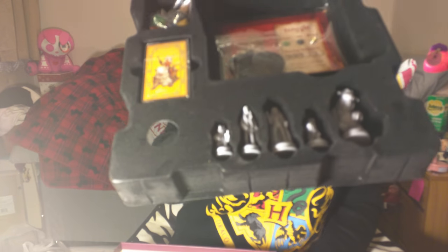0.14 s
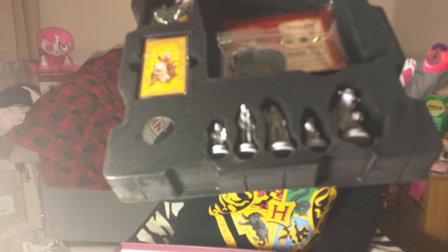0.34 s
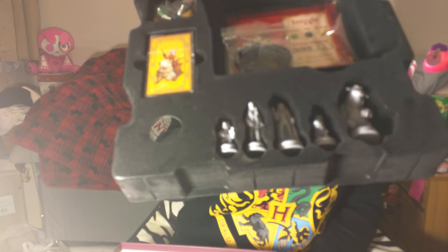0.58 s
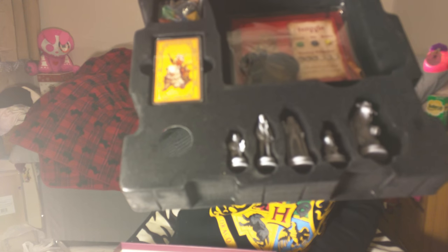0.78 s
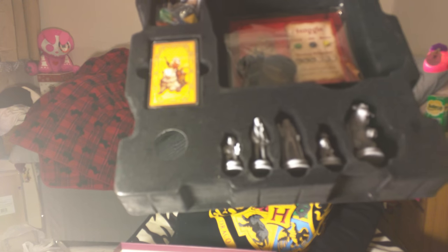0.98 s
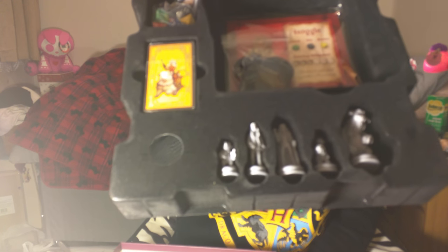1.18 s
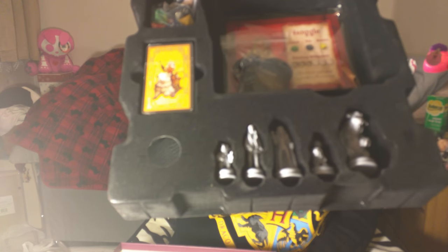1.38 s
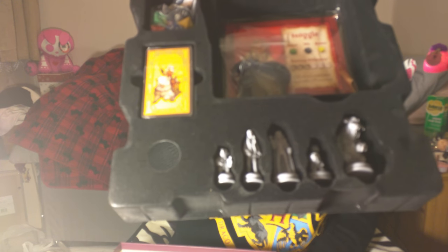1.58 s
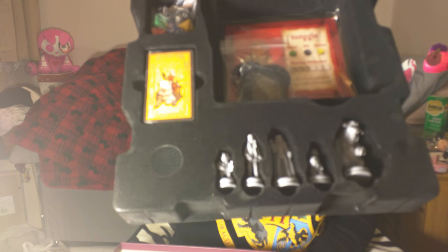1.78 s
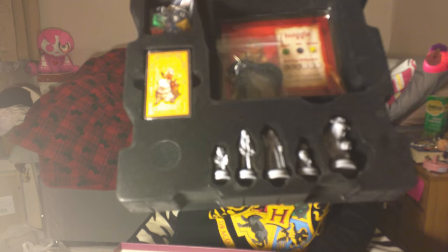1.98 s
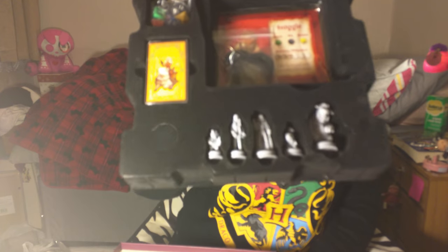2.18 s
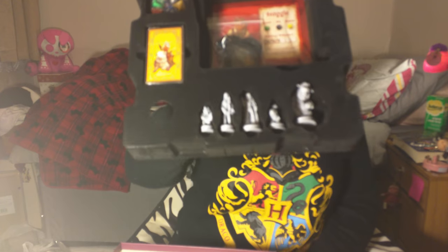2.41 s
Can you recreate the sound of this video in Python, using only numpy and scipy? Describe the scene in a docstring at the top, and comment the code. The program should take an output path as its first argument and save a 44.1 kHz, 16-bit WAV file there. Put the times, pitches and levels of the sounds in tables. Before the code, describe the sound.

Moulded plastic tray lifted from a cardboard box: loud hollow knock, faint rubbing, hissing scrape, clicks and bumps.

```python
"""A moulded game tray, lifted out of its cardboard box close by in a small furnished room, knocks and clicks.
Each knock rings a thump, hollow body modes and stiff walls; loose pieces ring and their bag crinkles in noise.
Granular friction noise makes the scrapes on cardboard, the finger rubs and the dull bumps; the hand rumbles.
Behind it are steady room noise, a sine mains hum and a thin whine of narrow noise that comes and goes."""
import sys
import numpy as np
from scipy import signal
from scipy.fft import rfft, irfft
from scipy.io import wavfile
from scipy.ndimage import uniform_filter1d

SR = 44100
rng = np.random.default_rng(int(sys.argv[2]) if len(sys.argv) > 2 else 0)


def dump(signal):
    """Clip the signal to [-1, 1] and save it as 16-bit WAV at the path in sys.argv[1]."""
    limited = np.clip(np.atleast_2d(signal).T, -1, 1)
    pcm = np.round(limited * 32767).astype(np.int16)
    wavfile.write(sys.argv[1], SR, pcm)


N = 108045  # samples

# Modes of the tray's hollow body before each blow weights them: pitch_hz, level_db, t60_s
BODY_MODES = [(209, -6, .08), (268, -5, .06), (308, 0, .09), (358, -2, .10), (442, -7, .06), (558, -2, .14),
              (690, -8, .07)]


def knocks():
    """Each knock thumps the tray and rings its hollow body and walls, with a snap at the contact."""
    # Knocks on the tray: start_s, thump_db, body_db, body_centre_hz, wall_db, wall_centre_hz, snap_db
    knock_rows = [(0.125, -67, -66, 400, -62, 1280, -77), (0.2204, -32.5, -24.5, 288, -26, 1140, -38.5),
                  (0.2228, -42.5, -25, 290, -32.5, 1190, -41), (.238, -66, -28, 430, -45, 1090, -39.5),
                  (.246, -46, -40, 400, -40.5, 1785, -38.5), (.358, -62, -58, 450, -38, 2050, -42),
                  (0.3613, -79, -41, 424, -30.5, 1738, -38), (0.3674, -70, -34, 369.4, -32.5, 1600, -65),
                  (0.903, -72, -45.5, 555, -40.5, 1180, -49), (.920, -61, -47, 497, -53, 1170, -51),
                  (1.168, -75, -50.5, 450, -50.5, 1620, -74), (1.372, -63, -58.5, 397, -54.5, 1860, -71),
                  (1.9629, -36.5, -45, 500, -38, 846, -40), (1.980, -59, -42, 500, -53, 726, -49.5),
                  (2.144, -57, -42, 440, -48.5, 930, -40), (2.153, -57, -44.5, 448, -46, 1400, -40.5),
                  (2.161, -54, -44.5, 450, -50.5, 1100, -49), (2.327, -59, -62, 305, -52.5, 1560, -68)]
    # Low modes of the whole tray: pitch_hz, level_db, t60_s
    thump_modes = [(116.3, -9, 0.035), (153, 2.5, 0.026), (217, 1, 0.15), (236, -9.5, 0.12)]
    # Spectrum of the contact snap: frequency_hz, level_db
    snap_colour = [(500, 6), (1500, -0.5), (2500, -3), (3700, -5.5), (4700, -11.5), (6000, -6),
                   (8000, -16.5), (11000, -19), (16000, -25)]
    out = np.zeros(N)
    for start_s, thump_db, body_db, body_hz, wall_db, wall_hz, snap_db in knock_rows:
        add_blow(out, start_s, ring(thump_modes), thump_db)
        add_blow(out, start_s, hollow_body(body_hz), body_db)
        add_blow(out, start_s, stiff_walls(wall_hz), wall_db)
        add_blow(out, start_s, crack(snap_colour, t60_s=0.054), snap_db)
    return out


def hollow_body(centre_hz):
    """Hollow body modes, strongest around the centre frequency of the blow."""
    spread_oct = 0.67
    modes = [(hz, db + place_db(hz, centre_hz, spread_oct), t60_s) for hz, db, t60_s in BODY_MODES]
    return ring(modes)


def stiff_walls(centre_hz):
    """Wall modes in a rattle: a decaying noise that stands for many dense, damped modes."""
    # Modes of the stiff walls before the blow weights them: pitch_hz, level_db, t60_s
    wall_modes = [(653, 8, 0.073), (796, 0.5, 0.031), (1037, -6.5, 0.058), (1190, -8.5, 0.021),
                  (1323, 7.5, 0.016), (1370, 2.5, 0.039), (1646, 2.5, 0.017), (1870, 3.5, 0.047),
                  (2120, -6, 0.035), (2166, -1.5, 0.11), (3470, 4.5, 0.19), (3720, 18.5, 0.059)]
    mode_spread_oct, rattle_spread_oct = 0.46, 0.44
    rattle_db = -2  # relative to the modes
    modes = ring([(hz, db + place_db(hz, centre_hz, mode_spread_oct), t60_s) for hz, db, t60_s in wall_modes])
    rattle_hz = np.geomspace(200, 6000, num=16)
    rattle_colour = [(hz, place_db(hz, centre_hz, rattle_spread_oct)) for hz in rattle_hz]
    rattle = crack(rattle_colour + [(16000, -50)], t60_s=0.065)
    return unit(modes) + undb(rattle_db) * unit(rattle)


def place_db(hz, centre_hz, spread_oct):
    """The place of a blow favours the modes around one frequency."""
    octaves_away = np.log2(hz / centre_hz)
    return max(-4 * (octaves_away / spread_oct) ** 2, -35)


def clicks():
    """Small pieces tick in their wells and their bag crinkles."""
    # Clicks of the pieces and their bag: start_s, ring_db, crinkle_db
    click_rows = [(0.3005, -62, -44), (.305, -55, -58), (0.318, -59, -51), (0.959, -54, -57),
                  (2.056, -49, -54.5), (2.1411, -34.5, -41), (2.147, -40.5, -53), (2.156, -47, -42.5),
                  (2.164, -57, -50), (2.304, -51, -56)]
    # Modes of a small piece: pitch_hz, level_db, t60_s
    piece_modes = [(2296, -5.5, 0.12), (2580, -0.5, 0.13), (2940, 9.5, 0.01), (3190, -0.5, 0.039),
                   (3714, -7, 0.075), (5010, -3, .03)]
    # Spectrum of the bag: frequency_hz, level_db
    crinkle_colour = [(800, -13), (2000, -5), (4000, 1.5), (6500, -2.5), (10000, 0), (13000, -4.5),
                      (16000, -12)]
    out = np.zeros(N)
    for start_s, ring_db, crinkle_db in click_rows:
        add_blow(out, start_s, ring(piece_modes), ring_db)
        add_blow(out, start_s, crack(crinkle_colour, t60_s=0.1), crinkle_db)
    return out


def long_scrape():
    """The tray comes free: friction on cardboard sings in narrow resonances while the body shudders."""
    # Course of the scrape: time_s, hiss_db, shudder_db
    scrape_course = [(1.6, -54, -72), (1.638, -51, -58.5), (1.676, -37.5, -41), (1.726, -36, -44),
                     (1.858, -51, -55.5), (1.922, -64, -58), (1.95, -59, -61)]
    # Spectrum of the hiss: frequency_hz, level_db
    scrape_colour = [(410, -18), (700, -15.5), (1010, -24), (1380, -6), (1920, -12.5), (2370, 0.5),
                     (3030, -14.5), (3790, -3.5), (6920, -8), (7490, -12.5), (9110, -11), (16000, -23)]
    # Resonances added to the hiss: pitch_hz, width_hz, level_db
    scrape_rings = [(1380, 60, -7), (2490, 170, -10), (3540, 89, 3.5), (5000, 160, -14), (6160, 94, -2),
                    (6800, 110, 1), (8970, 140, 2)]
    # Spectrum of the shuddering body: frequency_hz, level_db
    shudder_colour = [(60, -4.5), (95, 0.5), (190, -9), (330, -5.5), (560, -11), (800, -17), (1500, -23.5)]
    hiss = resonate(friction(scrape_colour, rough_db=-0.4), scrape_rings)
    shudder = friction(shudder_colour, rough_db=1.5)
    return hiss * curve(scrape_course) + shudder * curve(scrape_course, column=2)


def short_slide():
    """A short slide against the box: sparser slips, coloured by narrow resonances."""
    # Course of the slide: time_s, level_db
    slide_course = [(.664, -71), (.671, -46), (.70, -43.5), (.745, -48.5), (.785, -52.5), (.812, -62),
                    (.87, -68.5)]
    # Spectrum of the slide: frequency_hz, level_db
    slide_colour = [(150, -41), (250, -12), (313, -25), (367, 0), (452, -6), (686, -8), (938, -11),
                    (1080, -5.5), (2710, -2.5), (3400, -4), (3980, -3.5), (5350, -10), (7190, -8.5),
                    (16000, -17.5)]
    # Resonances added to the slide: pitch_hz, width_hz, level_db
    slide_rings = [(1220, 52, -1), (1630, 52, -4), (2030, 78, -11), (3160, 78, -17), (4130, 140, 1)]
    slide = friction(slide_colour, rough_db=1, grains_per_s=800)
    return resonate(slide, slide_rings) * curve(slide_course)


def finger_rubs():
    """Fingers rub the tray: a mid-range rasp and a high hiss of friction swell together."""
    # Finger rubs: start_s, rise_s, hold_s, release_s (per 20 dB of fall), rasp_db, hiss_db
    rub_rows = [(0.859, 0.038, 0.063, 0.15, -59.5, -64.5), (1.079, 0.016, 0.025, 0.034, -57, -68),
                (1.127, 0.041, 0.044, 0.12, -53.5, -56.5), (1.274, 0.018, 0.0085, 0.05, -57.5, -91),
                (1.358, 0.013, 0.096, 0.078, -57.5, -57), (1.475, 0.015, 0.014, 0.1, -54.5, -54),
                (1.556, 0.0059, 0.046, 0.086, -48.5, -53.5), (1.969, 0.022, 0.014, 0.032, -52, -59.5),
                (2.054, 0.045, 0.069, 0.054, -51, -52.5), (2.222, 0.06, 0.047, 0.16, -59.5, -78),
                (2.404, 0.017, 0.037, 0.056, -65, -67)]
    # Spectrum of the rasp: frequency_hz, level_db
    rasp_colour = [(250, -3.5), (450, 1), (800, -3), (1500, 6.5), (2000, -0.5), (2550, 3), (3100, -4.5),
                   (3600, -3), (5000, -13)]
    # Spectrum of the hiss: frequency_hz, level_db
    rub_hiss_colour = [(1500, -27), (3000, -11), (4500, -5), (6500, -2.5), (10000, -2), (16000, -5.5)]
    rasp = friction(rasp_colour, rough_db=1.0) * strokes(rub_rows, level_column=4)
    hiss = friction(rub_hiss_colour, rough_db=-3.5) * strokes(rub_rows, level_column=5)
    return rasp + hiss


def flexing_bumps():
    """The tray flexes with dull bumps of low friction noise that sound its hollow body modes."""
    # Bumps: start_s, rise_s, hold_s, release_s (per 20 dB of fall), level_db
    bump_rows = [(0.795, 0.019, 0.023, 0.051, -64), (1.07, 0.013, .05, 0.084, -58.5),
                 (1.177, 0.03, 0.0075, 0.075, -43), (1.385, 0.012, 0.16, 0.083, -65.5),
                 (1.554, 0.019, 0.04, 0.14, -57), (2.018, 0.045, 0.043, 0.025, -53.5),
                 (2.112, 0.015, 0.022, 0.044, -46.5), (2.191, 0.007, 0.01, 0.026, -47.5),
                 (2.232, 0.016, 0.0094, 0.019, -49), (2.285, 0.0068, .02, 0.024, -51.5),
                 (2.332, 0.0068, 0.011, 0.042, -53), (2.377, 0.0054, 0.0053, 0.02, -51),
                 (2.408, 0.0053, .015, 0.024, -60)]
    # Spectrum of the bumps: frequency_hz, level_db
    bump_colour = [(90, -0.5), (180, -8.5), (260, 2), (370, 2), (500, -5), (700, -12), (1200, -33)]
    ring_db = -1  # the same for every mode
    # A mode's bandwidth follows from its decay time
    body_rings = [(hz, np.log(1000) / np.pi / t60_s, ring_db) for hz, _, t60_s in BODY_MODES]
    bumps = resonate(friction(bump_colour, rough_db=1.5), body_rings)
    return bumps * strokes(bump_rows, level_column=4)


def hand_rumble():
    """The moving hand rumbles: low noise whose level swells and sinks."""
    # Course of the rumble: time_s, level_db
    rumble_course = [(0, -55), (1.1, -57), (1.9, -60), (1.98, -45), (2.05, -47.5), (2.17, -38.5),
                     (2.26, -48), (2.32, -40), (2.38, -47), (2.45, -46)]
    # Spectrum of the rumble: frequency_hz, level_db
    rumble_colour = [(15, 15.5), (30, -6), (45, 4), (65, -16), (110, 4), (220, -41.5)]
    return unit(colour(rng.standard_normal(N), rumble_colour)) * curve(rumble_course)


def ring(modes, detune=0.0074, scatter_db=-0.07):
    """Decaying sine modes; each blow detunes and weights them a little differently."""
    t, out = clock()[:N // 4], np.zeros(N)
    for k, (hz, db, t60_s) in enumerate(modes):
        pitch_draw, level_draw = rng.standard_normal(2)
        sign = (-1) ** (k // 2)  # alternates in pairs
        tone = np.sin(2 * np.pi * hz * (1 + detune * pitch_draw) * t)
        out[:len(t)] += sign * undb(db + scatter_db * level_draw) * tone * decay(t, t60_s)
    return out


def crack(points, t60_s):
    """A quickly dying burst of coloured noise."""
    return colour(rng.standard_normal(N) * decay(clock(), t60_s), points)


def add_blow(out, start_s, sound, db):
    """Mix in a blow whose first 3.6 ms have the given rms level."""
    start = max(int(start_s * SR), 0)
    onset = sound[:int(0.0036 * SR)]
    out[start:] += sound[:N - start] * undb(db) / np.sqrt(np.mean(onset ** 2))


def friction(points, rough_db=1.5, catch_hz=120, grains_per_s=2500):
    """Dense tiny slips over smooth hiss, catching unevenly."""
    grain_scatter_db, smooth_share = -1.5, 0.39  # share of the power
    is_slip = rng.random(N) < grains_per_s / SR
    slips = is_slip * rng.choice([-1, 1], N) * undb(grain_scatter_db * rng.standard_normal(N))
    hiss = rng.standard_normal(N)
    drive = np.sqrt(1 - smooth_share) * unit(slips) + np.sqrt(smooth_share) * hiss
    # Averaged noise makes the level waver
    catch = unit(uniform_filter1d(rng.standard_normal(N), int(SR / catch_hz)))
    return unit(colour(drive * undb(rough_db * catch), points))


def resonate(x, rings):
    """Add narrow (pitch_hz, width_hz, level_db) resonances to a friction noise."""
    out = x
    for hz, width_hz, db in rings:
        b, a = signal.iirpeak(hz, hz / width_hz, fs=SR)
        out = out + undb(db) * signal.lfilter(b, a, x)
    return unit(out)


def stroke(start_s, rise_s, hold_s, release_s):
    """Linear rise, hold, then a fall of 20 dB per release time."""
    t = clock() - start_s
    fall_db = -20 * np.maximum(t - rise_s - hold_s, 0) / release_s
    return np.clip(t / rise_s, 0, 1) * undb(fall_db)


def strokes(rows, level_column):
    """Sum of the strokes in a table, each at the level in the given column."""
    return sum(stroke(*row[:4]) * undb(row[level_column]) for row in rows)


def curve(rows, column=1):
    """Gain interpolated in dB between timed rows, all but silent outside them."""
    rows = np.array(rows)
    return undb(np.interp(clock(), rows[:, 0], rows[:, column], left=-120, right=-120))


def undb(db):
    """Decibels to amplitude."""
    return 10 ** (np.asarray(db) / 20)


def unit(x):
    """Scale to rms 1."""
    return x / np.sqrt(np.mean(x ** 2) + 1e-18)


def clock():
    """Time of every sample in seconds."""
    return np.arange(N) / SR


def decay(t, t60_s):
    """Exponential fall of 60 dB in t60_s."""
    return np.exp(-np.log(1000) * t / t60_s)


def bin_hz():
    """Frequency of every bin, raised by 1 Hz to keep clear of zero."""
    return np.arange(N // 2 + 1) * SR / N + 1


def on_log_axis(points):
    """Value of (frequency_hz, value) points at every frequency bin."""
    hz, value = np.array(points).T
    return np.interp(np.log(bin_hz()), np.log(np.maximum(hz, 1)), value)


def colour(x, points):
    """Filter with a (frequency_hz, level_db) response that falls away below its first point."""
    low_cut = 1 / np.sqrt(1 + (.5 * points[0][0] / bin_hz()) ** 4)
    return causal(x, undb(on_log_axis(points)) * low_cut + 1e-5)


def causal(x, gain):
    """Minimum-phase filter with the given gain at every frequency bin."""
    cepstrum = irfft(np.log(gain), N)
    # Fold the cepstrum forward in time
    cepstrum[1:N // 2] *= 2
    cepstrum[N // 2:] = 0
    return irfft(rfft(x) * np.exp(rfft(cepstrum)), N)


def room(x, wet_db):
    """Direct sound, a few wall echoes and a diffuse tail that decays at its own rate in each band."""
    # Decay of the room: band_hz, t60_s
    room_decay = [(150, 0.41), (400, 0.17), (1000, 0.28), (2500, 0.25), (6000, 0.3), (14000, 0.083)]
    # Nearby walls: delay_s, level_db
    wall_echoes = [(.0165, -16), (.0205, -17), (.0235, -25.5)]
    build_s = 0.007
    t, tail = clock(), np.zeros(N)
    for k, (_, t60_s) in enumerate(room_decay):
        # Each band crossfades into its neighbours
        band_power = on_log_axis([(hz, float(j == k)) for j, (hz, _) in enumerate(room_decay)])
        band_noise = irfft(rfft(rng.standard_normal(N)) * np.sqrt(band_power), N)
        tail += band_noise * decay(t, t60_s)
    tail *= (1 - np.exp(-t / build_s)) ** 2
    response = undb(wet_db) * unit(tail) / np.sqrt(N)
    response[0] = 1  # direct sound
    for delay_s, db in wall_echoes:
        response[int(delay_s * SR)] += undb(db)
    return signal.fftconvolve(x, even_out(response))[:N]


def even_out(response):
    """Level the narrow peaks and dips of a room response, so that no single note booms."""
    power = np.abs(rfft(response)) ** 2
    broad = uniform_filter1d(power, size=2000)
    narrow = uniform_filter1d(power, size=70)
    return causal(response, np.sqrt(broad / narrow))


def thin_whine():
    """Spells of a thin whine: noise in a very narrow high band."""
    # Spells of the whine: start_s, end_s (before its release), pitch_hz, level_db
    whine_rows = [(0, 0.22, 10770, -69), (0.87, 0.945, 10900, -64), (1.549, 1.596, 10800, -59),
                  (1.888, 1.963, 11050, -71)]
    width_hz = 65
    out = np.zeros(N)
    for start_s, end_s, hz, db in whine_rows:
        edges_hz = [hz - width_hz / 2, hz + width_hz / 2]
        band = signal.butter(2, edges_hz, "bandpass", fs=SR, output="sos")
        whine = unit(signal.sosfilt(band, rng.standard_normal(N)))
        out += undb(db) * whine * stroke(start_s, 0.0033, end_s - start_s, .008)
    return out


def mains_hum():
    """A steady sine from the mains."""
    hum_hz, hum_db = 120.5, -61.5  # rms level
    return undb(hum_db) * np.sqrt(2) * np.sin(2 * np.pi * hum_hz * clock())


def room_floor():
    """Steady room rumble and hiss from coloured noise."""
    # Spectrum of the room noise: frequency_hz, level_db
    floor_colour = [(14, 3), (40, -6), (70, -10.5), (130, -24.5), (220, -25), (500, -30.5), (1300, -34),
                    (3000, -35.5), (6400, -35), (11000, -31), (14000, -35.5), (16000, -32)]
    floor_db = -54.5  # rms level
    return undb(floor_db) * unit(colour(rng.standard_normal(N), floor_colour))


def scene():
    """Blows and friction sound in the room over the background, one channel."""
    blows = room(knocks() + clicks(), wet_db=-12)
    rubbing = long_scrape() + short_slide() + finger_rubs() + flexing_bumps() + hand_rumble()
    background = thin_whine() + mains_hum() + room_floor()
    return (blows + room(rubbing, wet_db=-13) + background)[None]


def record(dry):
    """The recorder cuts the top steeply."""
    top_hz = 15900
    low_pass = signal.ellip(10, .2, 70, top_hz, fs=SR, output="sos")
    return signal.sosfilt(low_pass, dry)


dry = scene()
out = record(dry)
dump(out)
```